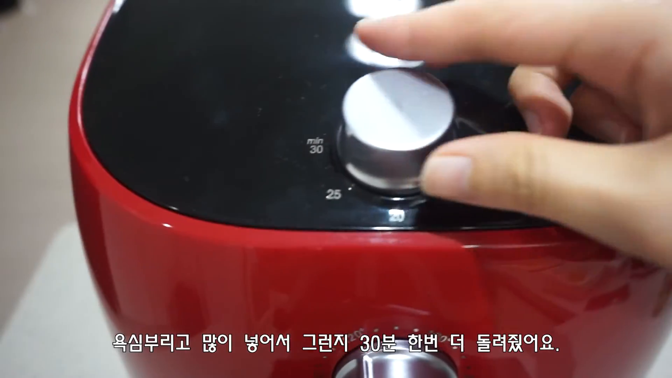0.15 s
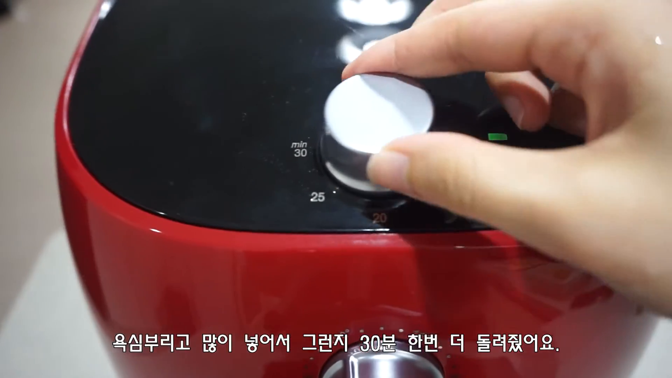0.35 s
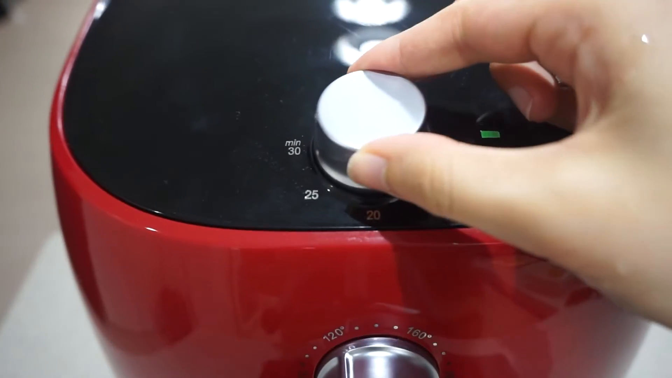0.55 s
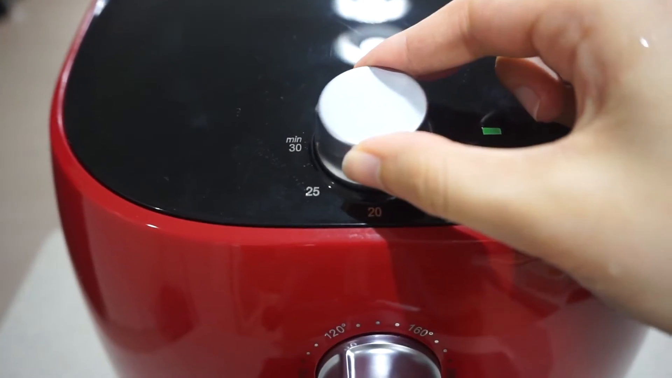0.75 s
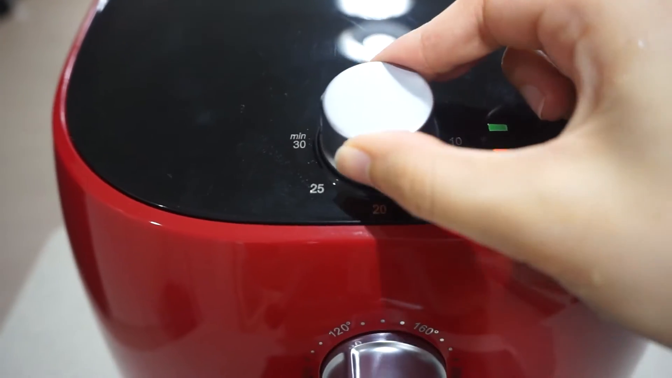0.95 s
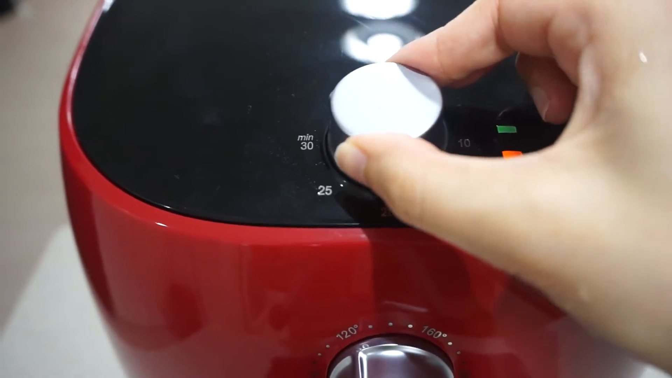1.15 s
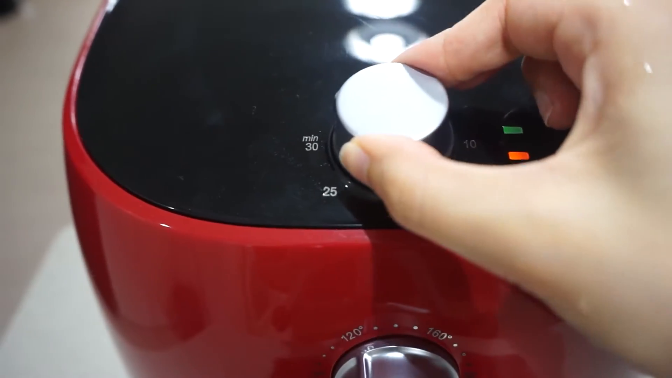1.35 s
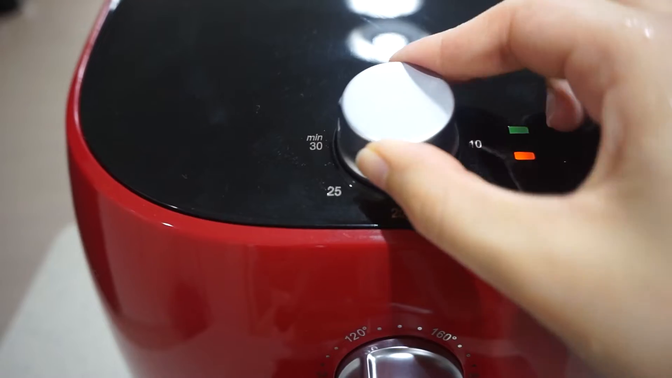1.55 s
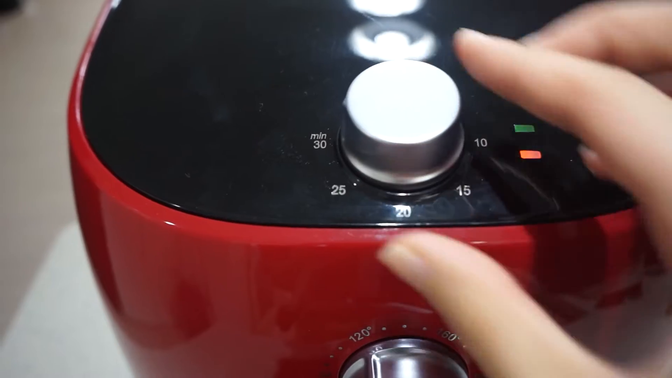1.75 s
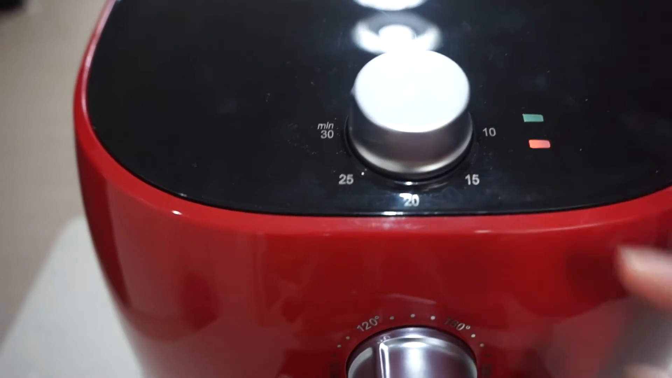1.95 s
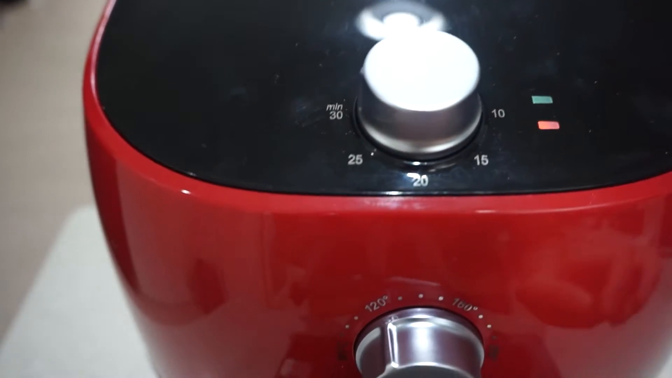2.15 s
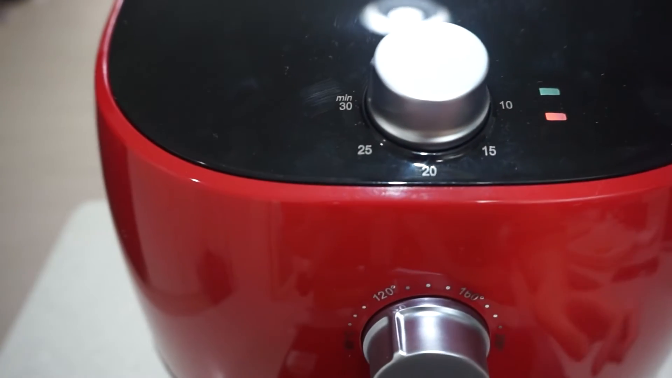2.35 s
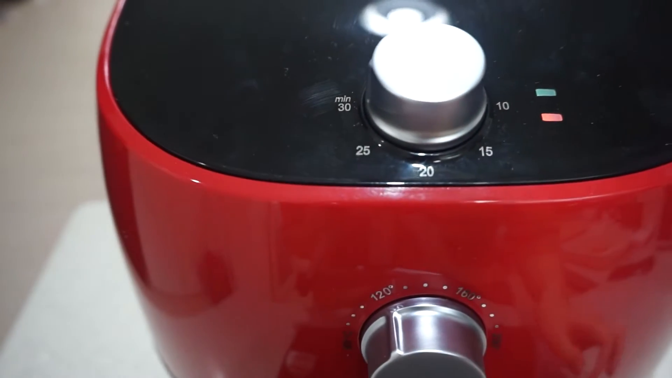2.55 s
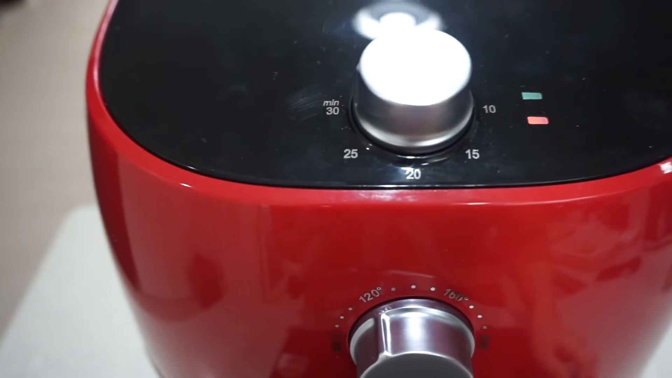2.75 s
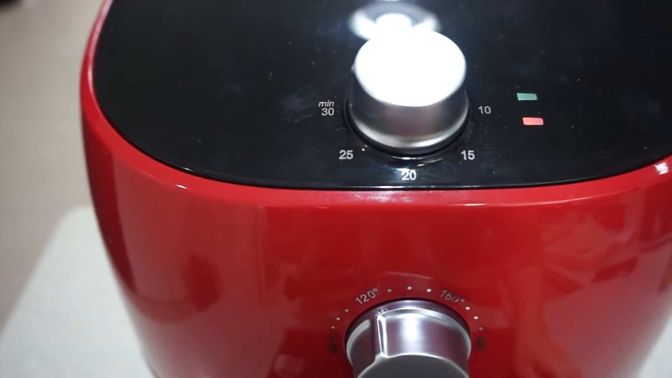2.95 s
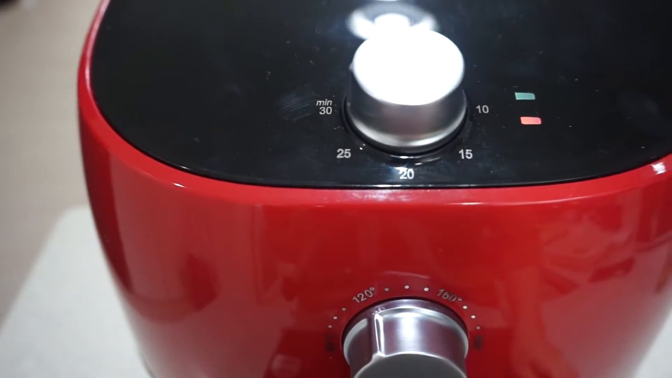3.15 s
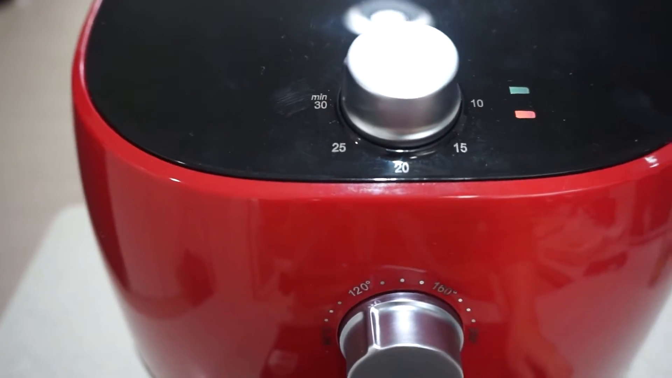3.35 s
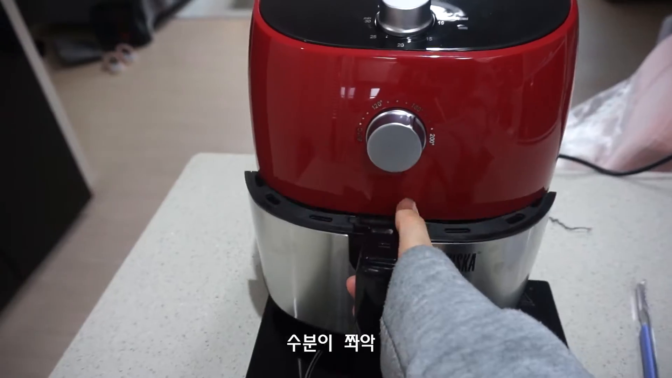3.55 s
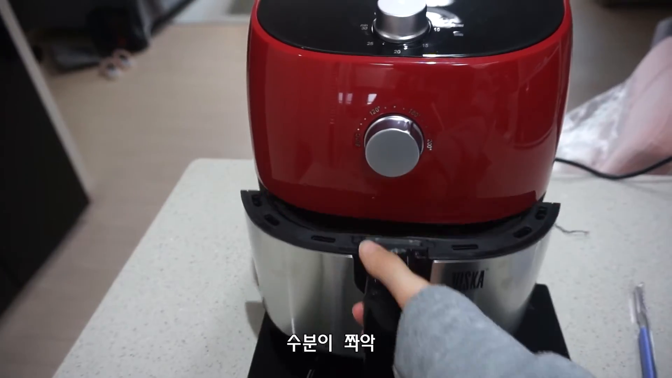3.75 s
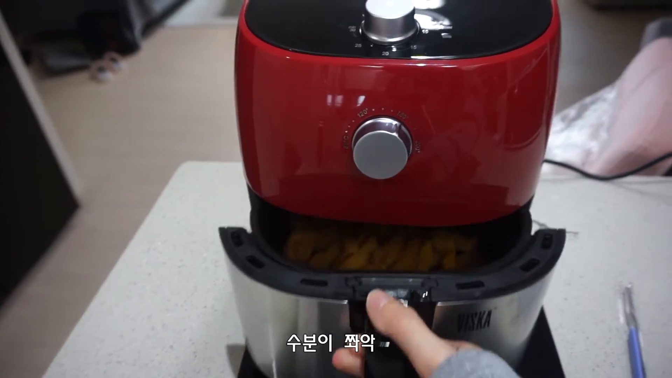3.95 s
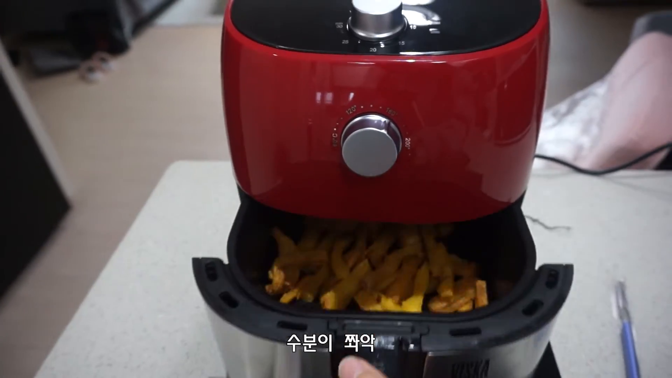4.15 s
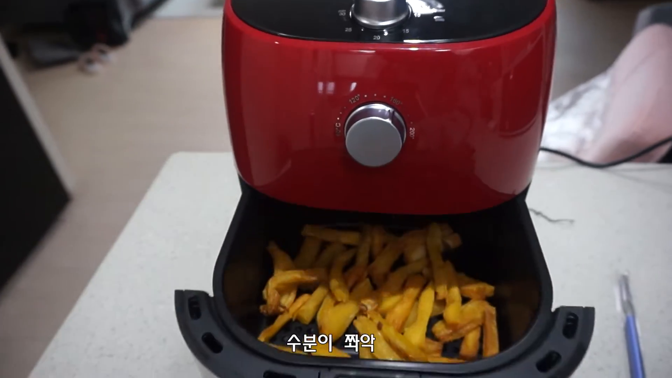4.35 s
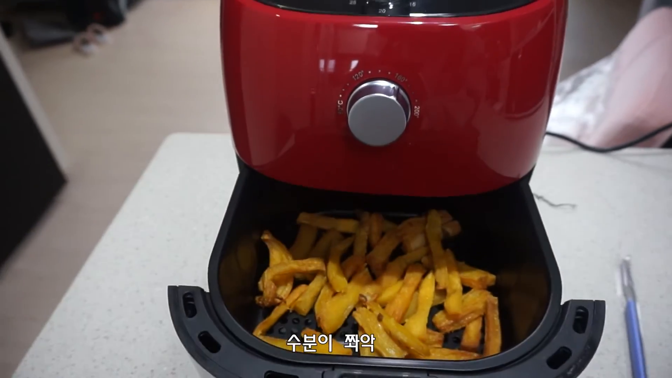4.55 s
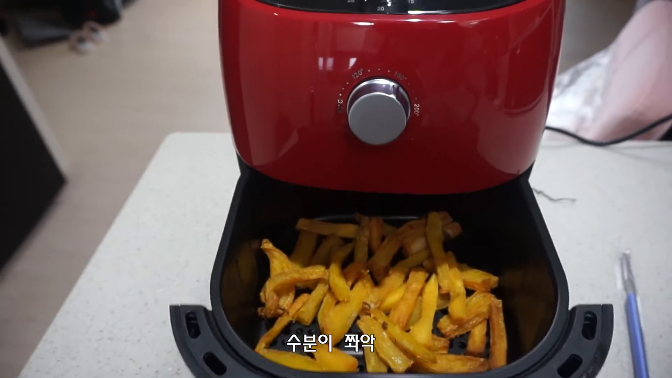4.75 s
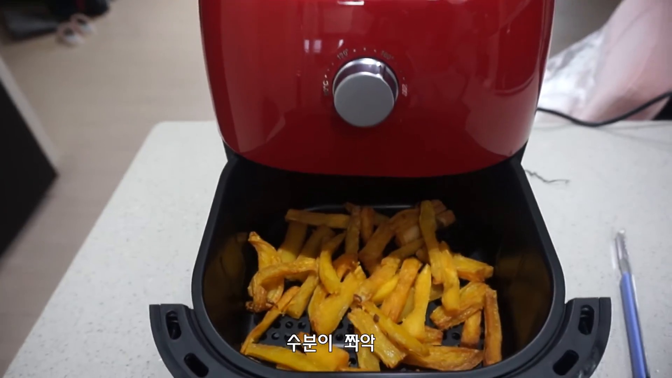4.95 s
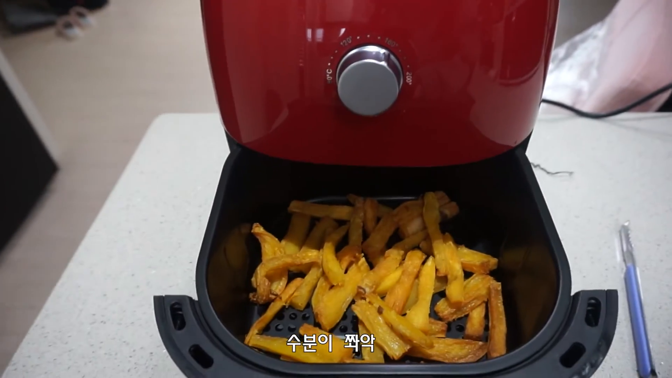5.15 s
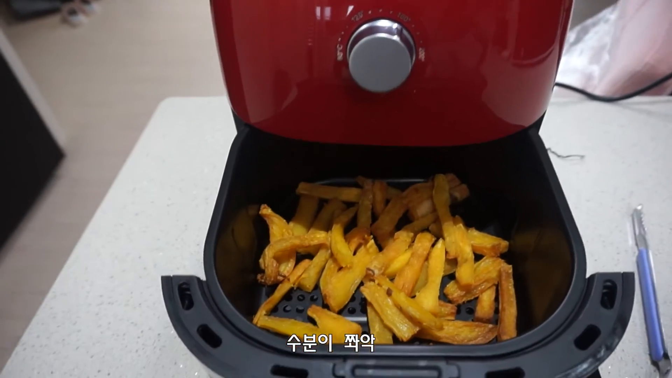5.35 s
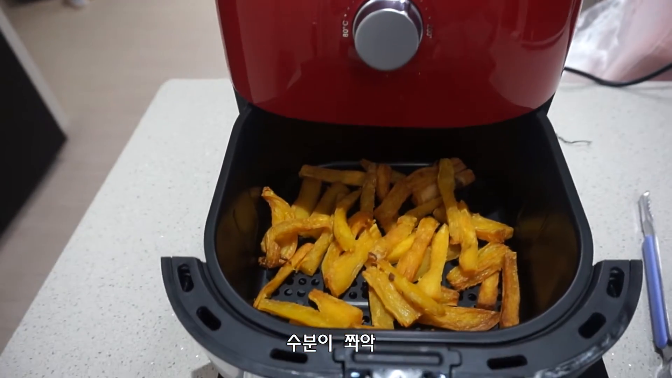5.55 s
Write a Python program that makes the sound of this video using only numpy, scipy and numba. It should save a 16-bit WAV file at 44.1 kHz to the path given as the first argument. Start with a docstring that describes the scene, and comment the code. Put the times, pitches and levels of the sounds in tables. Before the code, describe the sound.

A spring timer knob ratchets loudly over a humming fan and ticking clockwork, then a basket scrapes out and knocks in a quiet room.

```python
"""Two scenes of an air fryer on a kitchen counter, close to the right of a two-port microphone. In the first
its fan, air noise with a rising blade tone, runs up to speed over mains hum, and the clockwork ticks.
A hand winds the spring timer, the pawl's bursts ringing the knob; the fingers click off it, the ticking
goes on and something brushes softly nearby. The scene changes at once to a quiet room without the fan: the
basket is dragged out as noise through resonances, knocks against its stop and is pushed a little further."""
import sys
import numpy as np
from scipy import signal
from scipy.fft import rfft, irfft, next_fast_len
from scipy.io import wavfile
from numba import njit

SR = 44100
rng = np.random.default_rng(int(sys.argv[2]) if len(sys.argv) > 2 else 0)


def generate_wav(signal):
    """Clip the signal to [-1, 1] and save it as 16-bit WAV at the path in sys.argv[1]."""
    frames = np.transpose(np.atleast_2d(signal))
    scaled = np.clip(frames, -1, 1) * 32767
    pcm = np.round(scaled).astype(np.int16)
    wavfile.write(sys.argv[1], SR, pcm)


def invert_db(x):
    """Field ratio 10**(x/20) for x, a level in decibels (scalar or array-like)."""
    u = np.asarray(x, float) / 20
    return 10 ** u


N = 250929
SIZE = next_fast_len(N + SR)   # room for the filters to ring out
HZ = np.maximum(np.arange(SIZE // 2 + 1) * SR / SIZE, 1)
TIME = np.arange(N) / SR
SCENE_CHANGE_S = 3.506
# the two microphone ports: (frequency [Hz], left minus right [dB], left leads by [rad],
# likeness of fan and knob buzz [0-1], likeness of room [0-1], likeness of basket [0-1])
PORTS = [(100, 0.5, 0.18, 1, 0.89, 0.99), (258, -1, 0.11, 0.94, 0.69, 1), (503, 0, 0, 0.34, 0.25, 1),
         (1000, -2.5, 0.68, 0.3, 0.21, 1), (1900, -5.5, 0.96, 0, 0.033, 0.18),
         (4000, -2.5, 0.82, 0, 0.03, 0.45), (8000, -3, 0.61, 0.7, 0.3, 0.43)]


def rms_one(x):
    """Scale to unit rms."""
    return x / np.sqrt(np.mean(x ** 2) + 1e-20)


def in_time(rows):
    """Columns of a table as curves over time."""
    s, *columns = np.transpose(rows)
    return [np.interp(TIME, s, c) for c in columns]


def at_hz(points, axis=1):
    """One column of a table over the frequency axis, straight in log frequency."""
    points = np.array(points)
    return np.interp(np.log(HZ), np.log(points[:, 0]), points[:, axis])


def shaped(x, gain):
    """Filter by a frequency response."""
    return irfft(rfft(x, SIZE) * gain, SIZE)[..., :N]


def causal(level_db):
    """Minimum-phase response of a dB curve, so that nothing sounds early."""
    cepstrum = irfft(level_db * np.log(10) / 20, SIZE)
    cepstrum[1:SIZE // 2] *= 2
    cepstrum[SIZE // 2 + 1:] = 0
    return np.exp(rfft(cepstrum))


def humps(bed, modes, share=0.91):
    """A broad dB spectrum with a share of each mode's rise on top, none sharper than plastic allows."""
    least = .025   # smallest half width over frequency
    rise = sum(db / (1 + ((HZ - hz) / max(w, least * hz)) ** 2) for hz, w, db in modes)
    return at_hz(bed) + share * rise


def resonances(modes):
    """Resonators in parallel, signs alternating; modes are (Hz, width Hz, dB)."""
    total = 0
    for k, (hz, w, db) in enumerate(modes):
        total = total + (-1) ** k * invert_db(db) * 1j * HZ * w / (hz ** 2 - HZ ** 2 + 1j * HZ * w)
    return total


def drift(rate):
    """Slow random curve through normal knots, rate of them a second."""
    knots = np.arange(0, N + SR / rate, SR / rate)
    return np.interp(np.arange(N), knots, rng.standard_normal(len(knots)))


def bursts(times, peaks_db, swell_s, fall_s):
    """Each contact is a short chatter: noise that swells and dies within milliseconds."""
    clicks = np.zeros(N)
    np.add.at(clicks, (np.asarray(times) * SR).astype(int), invert_db(np.asarray(peaks_db)))
    t = np.arange(2000) / SR
    shape = (1 - np.exp(-(t / swell_s) ** 2)) * np.exp(-t / fall_s)
    return signal.fftconvolve(clicks, shape / shape.max())[:N] * rng.standard_normal(N)


def ports(x):
    """A near source on the right reaches the two ports with a level and phase offset."""
    half = invert_db(at_hz(PORTS) / 2) * np.exp(.5j * at_hz(PORTS, axis=2))
    return shaped(x, np.array([half, 1 / half]))


def spread(x, other, axis):
    """Stereo from two unrelated noises, alike as one column of the ports table says."""
    alike = np.clip(at_hz(PORTS, axis=axis), 0, 1)
    common = shaped(x, np.sqrt((1 + alike) / 2))
    opposed = shaped(other, np.sqrt((1 - alike) / 2))
    return common + opposed * [[1], [-1]]


def fan():
    """Turbulent air through the housing, a wavering blade tone with its octave, and the mains hum."""
    # colour of the air: (frequency [Hz], relative density [dB per Hz])
    air_bed = [(15, -79), (25, -25), (65, -22), (111, -13.5), (185, -1), (252, -5.5), (317, -13.5),
               (379, -12.5), (431, -19), (478, -13.5), (758, -18), (819, -20), (1640, -26.5),
               (10600, -41.5), (11500, -36), (15000, -92), (22000, -120)]
    # cavity resonances: (frequency [Hz], nominal half width [Hz], nominal rise [dB])
    housing = [(155, 9.1, 9), (493, 120, 1.5), (750, 7.7, 9), (962, 10, 6), (2150, 100, -1)]
    # hum before its drift: (frequency [Hz], level [dB rms])
    mains = [(120, -59.5), (240, -63.5), (360, -73.5), (480, -76)]
    # blade tone, relative: (time [s], level [dB])
    blade_level = [(0.4, -67), (0.55, -71), (2, -71.5), (2.7, -64.5)]
    heater_on_s, load_rise_s = 0.44, 0.064
    air = rms_one(spread(*shaped(rng.standard_normal((2, N)), invert_db(humps(air_bed, housing))), axis=3))
    rumble = shaped(air, 1 / (1 + (HZ / 600) ** 4))
    # the rumble grows as the heater comes on
    rumble_db = np.interp(TIME, [heater_on_s, heater_on_s + load_rise_s], [-56, -54])
    air = invert_db(rumble_db + 0.63 * drift(13.0)) * rumble + invert_db(-57.5) * (air - rumble)
    blade_hz = 186 + 5 * TIME
    turn = 2 * np.pi * np.cumsum(blade_hz) / SR
    blade_db = in_time(blade_level)[0] - 0.5 + 5 * drift(6)
    tones = invert_db(blade_db) * (np.sin(turn) + invert_db(-7.5) * np.sin(2 * turn))
    load = np.clip((TIME - heater_on_s) / .05, .3, 1)   # overtones of the hum grow under load
    for k, (hz, db) in enumerate(mains):
        peak_db = db + 3 + (2.0 + k) * drift(4.76)   # a sine peaks 3 dB above its rms
        tones += invert_db(peak_db) * np.sin(2 * np.pi * hz * TIME + k) * (load if k else 1)
    return ports(air + tones) * np.clip((SCENE_CHANGE_S - TIME) / 0.0028, 0, 1)


def ticks():
    """Tick and tock of every balance swing, the swings slowing a little: (s, dB, second beat dB)."""
    # free swings: (first tick [s], until [s], first full swing [s], relative level [dB])
    swings = [(0.0279, 0.1, 0.421, -45.5), (1.7629, 3.2, 0.4326, -45.5)]
    tock_share, slowing_s = 0.5175, 0.0025   # place of the swing back; each swing lasts this much longer
    tock_db = -3   # tock against tick
    tick_echo_db, tock_echo_db = -15, -26   # second beat against the first
    rows = []
    for first, until, period, db in swings:
        for k, s in enumerate(np.arange(first, until, period)):
            s += slowing_s * k * (k - 1) / 2
            rows.append((s, db, tick_echo_db))
            rows.append((s + tock_share * period, db + tock_db, tock_echo_db))
    return np.transpose(rows)


def clockwork():
    """Each tick of the escapement rings the works, with a second beat a few ms later."""
    # clockwork resonances: (frequency [Hz], width [Hz], relative level [dB])
    works = [(1850, 33, -2), (2150, 125, 3), (3150, 200, -2), (3500, 350, -5.5), (4250, 310, -2.5),
             (5420, 165, 0.5), (6230, 350, -6), (7900, 1060, -11.5), (9150, 210, -8.5),
             (11100, 1100, -10.5)]
    s, db, second_db = ticks()
    beats = bursts(np.r_[s, s + .0075], np.r_[db, db + second_db], 0.00044, 0.0059)
    return invert_db(5.5) * shaped(beats, resonances(works))


def echoes(x):
    """Diffuse room tail, alike at both ports in the bass, the treble dying faster."""
    room_t60_s, room_db, wall_cut_hz = 0.4, -7.5, 2200
    t = TIME[:SR // 2]
    noise = spread(*rng.standard_normal((2, len(t))), axis=4)[:, :len(t)] * (t > .004)
    dull = signal.lfilter(*signal.butter(1, wall_cut_hz, fs=SR), noise)
    tail = dull * invert_db(-60 * t / room_t60_s) + (noise - dull) * invert_db(-60 * t / (0.56 * room_t60_s))
    return invert_db(room_db) * shaped(x, rfft(tail / np.sqrt(np.sum(tail[0] ** 2)), SIZE))


def teeth():
    """Times and strengths of the pawl snaps, one at every whole tooth."""
    # the hand winds the knob: (time [s], teeth turned so far)
    winding_path = [(0.4837, 0), (0.4997, 1), (0.51, 2), (0.5525, 8), (0.573, 10), (0.622, 11),
                    (0.6349, 12), (0.644, 13), (0.6568, 14), (0.6764, 15), (0.727, 16), (0.7431, 17),
                    (0.7642, 18), (0.7964, 19), (0.821, 20), (0.8658, 22), (0.9128, 23), (0.9312, 24),
                    (0.941, 25), (0.9557, 27), (1.0084, 33), (1.0155, 34), (1.1583, 35)]
    # strength of the snap, relative: (time [s], level [dB])
    snap_level = [(0.484, -35), (0.53, -31), (0.565, -27.5), (0.76, -28), (0.91, -30.5), (0.95, -27),
                  (1.015, -26.5), (1.158, -31.5)]
    tooth_count, tooth_spread_db = 36, 1.2
    s, turned = np.transpose(winding_path)
    s = np.interp(np.arange(tooth_count), turned, s)
    db = np.interp(s, *np.transpose(snap_level))
    return s, db + tooth_spread_db * rng.standard_normal(tooth_count)


def winding():
    """Pawl snaps ring the knob, which beams its modes upward, and buzz the lid: (direct, towards walls)."""
    # timer and lid resonances: (frequency [Hz], nominal half width [Hz], nominal rise [dB])
    knob_modes = [(500, 40, 21), (775, 19, 9), (1150, 21, 12), (1406, 28, 8), (1883, 89, 11),
                  (3000, 90, 11), (3400, 33, 13), (3880, 71, 14), (4350, 100, 12), (5300, 100, 9),
                  (6310, 254, 19.5), (7820, 120, 10), (9500, 200, 12), (10670, 440, 10)]
    # broad colour of the snap: (frequency [Hz], relative density [dB per Hz])
    knob_bed = [(200, -33), (400, -21.5), (1000, -14.5), (2000, -4.5), (3000, -13.5), (6000, -19),
                (8000, -24), (11000, -20.5), (15000, -36)]
    s, db = teeth()
    snap = bursts(s, db, 0.0015, 0.003)
    knob = invert_db(2.5) * shaped(snap, causal(humps(knob_bed, knob_modes)))
    # the walls hear a flatter snap
    sideways = invert_db(8) * shaped(snap, causal(humps(knob_bed, knob_modes, share=.35)))
    # loose plastic, no clear pitch
    buzz = [bursts(s + 0.004, db - 9, 0.0022, 0.0023) for port in range(2)]
    buzz = spread(*shaped(buzz, causal(at_hz(knob_bed))), axis=3)
    return knob + buzz, sideways


def letting_go():
    """The knob clicks as the fingers leave it, each click a burst through one resonance."""
    # clicks: (time [s], relative level [dB], frequency [Hz], width [Hz])
    releases = [(1.612, -50, 5820, 3000), (1.633, -47.5, 3500, 900), (1.691, -45, 2150, 300)]
    out = np.zeros(N)
    for s, db, hz, width_hz in releases:
        out += shaped(bursts([s], [db + 2.5], 0.00028, 0.0052), resonances([(hz, width_hz, 0)]))
    return out


def rustle():
    """Soft grainy noise around 1.3 kHz: a brief brush nearby."""
    # the brush: (time [s], level [dB])
    brush_level = [(2.38, -110), (2.40, -61.5), (2.46, -65.5), (2.52, -69), (2.6, -110)]
    noise = rng.standard_normal(N) * invert_db(3 * drift(60))
    noise = rms_one(shaped(noise, resonances([(900, 230, -5.0), (1470, 370, -0.5)])))
    return invert_db(in_time(brush_level)[0]) * noise


def scraping_bands(grains):
    """Swelling and fading bands of scraping noise: judders, a narrow squeal, high patches, a late rustle."""
    # bands: (time [s], half of the sounding length [s], level before the swell [dB],
    # frequency [Hz], width [Hz])
    bands = [(3.505, 0.18, -56.5, 430, 120), (3.78, 0.045, -55.5, 376, 120), (3.97, 0.08, -44, 1080, 201),
             (4.129, .06, -43.5, 537, 200), (4.155, 0.098, -55, 1850, 30), (4.158, 0.12, -48, 424, 150),
             (4.213, 0.083, -48, 635, 150), (4.319, 0.055, -43, 680, 248), (4.383, 0.054, -40.5, 265, 81),
             (4.434, 0.052, -45, 630, 300), (4.44, 0.05, -45.5, 1500, 199), (4.584, 0.028, -53.5, 300, 80),
             (4.766, 0.076, -56, 330, 150), (4.865, 0.081, -52.5, 326, 150), (3.886, .07, -56, 1545, 80),
             (3.976, .08, -60, 4540, 300), (4.166, .08, -57, 2900, 150), (4.18, 0.095, -58.5, 4350, 300),
             (5.052, 0.23, -69.5, 795, 700)]
    attack = 0.34   # share of the half length spent swelling
    out = np.zeros(N)
    for s, length, db, hz, width_hz in bands:
        i, n = int(s * SR), int(length * SR)
        swell_db = np.interp(np.arange(2 * n) / n, [0, attack, 1, 2], [-6, -1.5, -10, -42])
        tone = signal.lfilter(*signal.iirpeak(hz, hz / width_hz, fs=SR), grains[i:i + 2 * n])
        out[i:i + 2 * n] += invert_db(db + swell_db) * rms_one(tone)
    return out


@njit
def gliding(x, hz, width_hz, sr):
    """A two-pole resonance whose centre moves."""
    out, r = np.zeros(len(x)), np.exp(-np.pi * width_hz / sr)
    for i in range(2, len(x)):
        driven = x[i] - x[i - 2]
        out[i] = driven + 2 * r * np.cos(2 * np.pi * hz[i] / sr) * out[i - 1] - r * r * out[i - 2]
    return out


def basket():
    """Dense stick-slip grains ring the basket; the cavity behind it and the rails wander in pitch."""
    # basket resonances: (frequency [Hz], nominal half width [Hz], nominal rise [dB])
    basket_modes = [(215, 50, 8.5), (463.3, 6.7, 13.5), (660, 19, 4.5), (1060, 64, 0.5), (1360, 120, -1.5),
                    (1774, 10, -18), (2330, 37, 5), (3080, 130, 1.5), (3450, 72, 2), (4540, 160, 1.5),
                    (6370, 140, -1.5)]
    # broad colour of the scrape: (frequency [Hz], relative density [dB per Hz])
    basket_bed = [(35, -47), (100, -27), (150, -7), (400, 5), (1000, 11.5), (2500, -9.5), (5000, -17.5),
                  (10000, -25.5), (15000, -33)]
    # how hard the basket slides, setting the hiss: (time [s], relative level [dB])
    slide = [(3.51, -65.5), (3.58, -60.5), (3.69, -71), (3.77, -64), (3.85, -55.5), (3.93, -52),
             (4.0, -49.5), (4.09, -52.5), (4.18, -51), (4.28, -55.5), (4.38, -49.5), (4.42, -43.5),
             (4.51, -55), (4.6, -71.5), (4.72, -73), (4.83, -58.5), (4.94, -59.5), (4.99, -75), (5.2, -75)]
    hiss_db, = in_time(slide)
    swing = hiss_db + 58   # against mean sliding
    grains = rng.standard_normal((2, N)) * invert_db(1.5 * drift(700) + .5 * drift(40))
    body = invert_db(humps(basket_bed, basket_modes))
    low = 1 / (1 + (HZ / 400) ** 4)
    high = 1 / (1 + (1700 / HZ) ** 4)
    deep = resonances([(105, 110, 0)]) ** 2
    parts = (body * low, body * (1 - low - high), body * high, deep)
    boom, rub, hiss, rumble = (rms_one(spread(*shaped(grains, part), axis=5)) for part in parts)
    wander = 0.11   # share of the pitch
    cavity = rms_one(gliding(grains[0], 483 * (1 + wander * drift(16)), 100., SR))
    rails = rms_one(gliding(grains[1], 1850 * (1 + wander * drift(12)), 160., SR))
    # each layer: a level at mean sliding plus its share of the swing
    scrape = invert_db(swing - 64) * rub + invert_db(swing - 77.5) * cavity
    scrape = scrape + invert_db(hiss_db + 1) * hiss + invert_db(hiss_db - 10.5) * rails
    booming = invert_db(-58.5 + 0.56 * swing) * boom
    # the counter shakes when the basket meets its stop
    stop_s, swell_s, stop_t60_s = 4.4, .15, 1.26   # 60 dB up, 60 dB down
    shake = invert_db(-60.5 - 60 * np.abs(TIME - stop_s) / np.where(TIME > stop_s, stop_t60_s, swell_s))
    counter = (invert_db(-94 + 0.23 * swing) + shake) * rumble
    moving = (TIME > SCENE_CHANGE_S) * np.clip((slide[-1][0] - TIME) / 0.2, 0, 1) ** 2
    return moving * (scrape + booming + counter) + scraping_bands(grains[0])


def kitchen_air():
    """The steady murmur of an empty room, heard after the scene changes at once to one without the fan."""
    # quiet room: (frequency [Hz], relative density [dB per Hz])
    room_bed = [(12, -42), (20, -6.5), (86, -16), (278, -6.5), (784, -10.5), (849, -12.5), (945, -14),
                (1330, -13.5), (2040, -23), (9800, -31.5), (11500, -30), (15000, -94), (22000, -120)]
    air = spread(*shaped(rng.standard_normal((2, N)), invert_db(at_hz(room_bed))), axis=4)
    return invert_db(-66.5 + np.array([[.6], [-.6]])) * rms_one(air) * (TIME > SCENE_CHANGE_S)


def knocks():
    """A crack as bright as the contact; the shell rings most near the pitch the struck spot favours."""
    # basket knocks: (time [s], crack level before its decay [dB], contact brightness [Hz],
    # relative ring level [dB], favoured pitch [Hz])
    hits = [(3.977, -45, 2200, -30, 1060), (4.005, -50, 1500, -27.5, 1060), (4.03, -52, 1000, -40.5, 466),
            (4.318, -35.5, 2450, -28, 1690), (4.387, -54, 4000, -27, 660), (4.399, -33.5, 8000, -28.5, 238),
            (4.409, -30, 900, -28.5, 225), (4.455, -32, 1760, -48, 466), (4.584, -48, 600, -62, 300),
            (5.012, -44.5, 6300, -48.5, 590)]
    # shell modes: (frequency [Hz], relative level [dB], time to fall 60 dB [s])
    shell = [(225, -2.5, .11), (300, 7, 0.13), (466, 6, 0.078), (590, -5, 0.11), (660, -2.5, 0.081),
             (907, 0.5, 0.044), (1074, -3, 0.052), (1500, 2, 0.027), (1690, -1.5, 0.036), (1850, -4, 0.023)]
    crack_s, crack_span, favour_db_per_oct = .003, 4.5, 39   # span: ratio of the crack's band edges
    out, t = np.zeros(N), TIME[:4000]
    mode_hz, mode_db, t60 = np.transpose(shell)[:, :, None]
    modes = invert_db(mode_db - 60 * t / t60) * np.sin(2 * np.pi * mode_hz * t) * (1 - np.exp(-t / 0.0012))
    for s, crack_db, bright_hz, ring_db, hz in hits:
        band = [bright_hz / crack_span, min(bright_hz, 15000)]
        crack = signal.lfilter(*signal.butter(2, band, "band", fs=SR), rng.standard_normal(len(t)))
        crack = invert_db(crack_db) * rms_one(crack) * np.exp(-t / crack_s)
        away_oct = np.abs(np.log2(mode_hz / hz))
        ring = np.sum(invert_db(ring_db - favour_db_per_oct * away_oct) * modes, axis=0)
        i = int(s * SR)
        out[i:i + len(t)] += crack + ring
    return signal.lfilter(*signal.butter(3, 150, "high", fs=SR), out)   # a light shell radiates no deep bass


def scene():
    """All sources of both scenes, the near ones with their echoes."""
    snaps, sideways = winding()
    clicks = clockwork() + letting_go()
    near = knocks() + rustle() + basket()
    direct = ports(snaps + clicks + near)
    return direct + echoes(sideways + clicks + near.mean(axis=0)) + fan() + kitchen_air()


def roll_off(x):
    """The treble ends steeply here."""
    return signal.sosfilt(signal.butter(12, 12260, fs=SR, output="sos"), x)


def record(dry):
    """The top is cut steeply above 11.2 kHz."""
    cut = signal.sosfilt(signal.cheby2(16, 28, 11200, fs=SR, output="sos"), dry)
    return roll_off(cut)


dry = scene()
out = record(dry)
generate_wav(out)
```